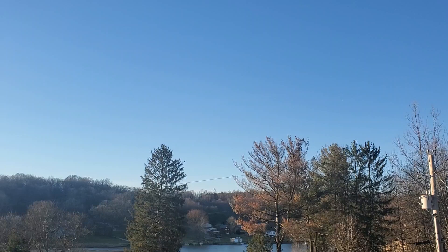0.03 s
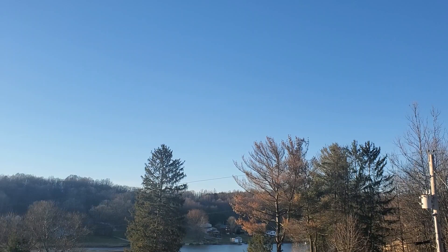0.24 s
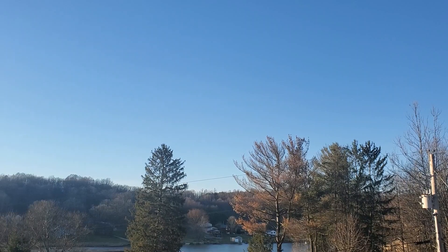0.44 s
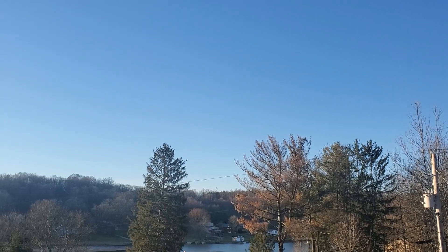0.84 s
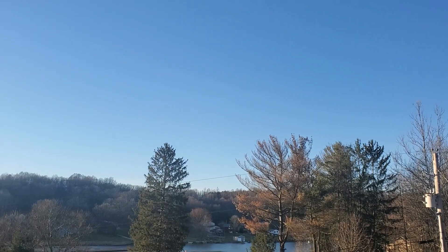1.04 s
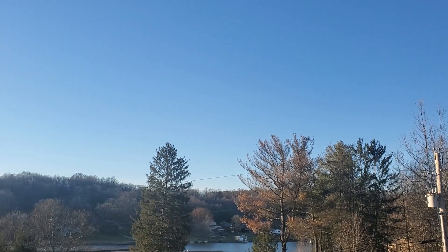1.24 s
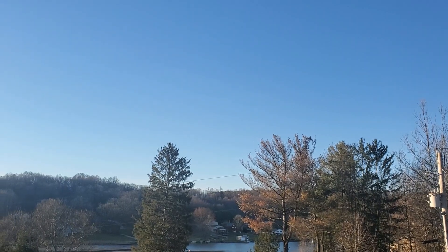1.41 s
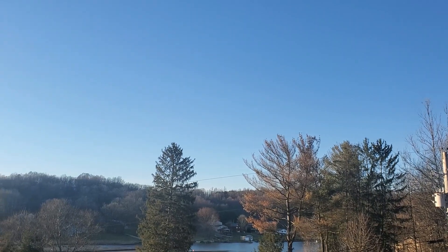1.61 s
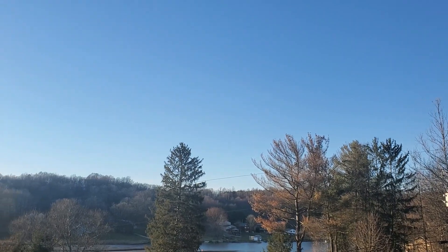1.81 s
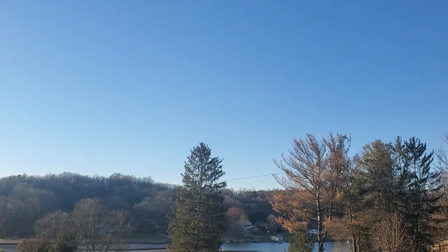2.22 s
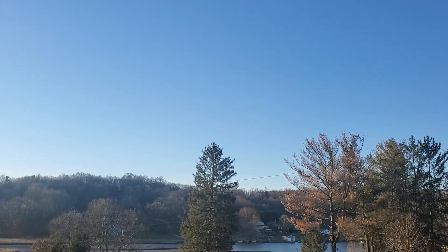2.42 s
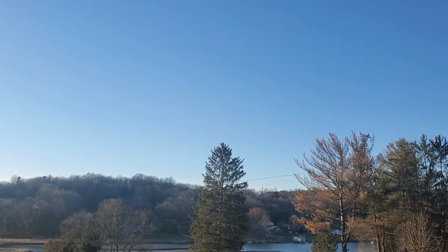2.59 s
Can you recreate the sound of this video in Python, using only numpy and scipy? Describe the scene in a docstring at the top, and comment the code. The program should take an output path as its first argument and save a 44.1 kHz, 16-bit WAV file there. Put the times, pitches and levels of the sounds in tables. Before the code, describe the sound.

A dense chorus of small frogs peeps over low wind rumble and faint distant birds.

```python
"""A chorus of small frogs peeps around a lake, each call a short, near-pure whistle sliding upward.
Near frogs stand out of a far crowd whose calls overlap. Distant birds whistle and chip, and the
wooded shore reflects birds and frogs as a diffuse echo. Under them lie a valley hum and a wash
of far callers, while a light, turbulent wind buffets two microphones, mostly the right one."""
import sys
import numpy as np
from scipy import signal
from scipy.fft import rfft, irfft
from scipy.io import wavfile

SR = 44100
rng = np.random.default_rng(int(sys.argv[2]) if len(sys.argv) > 2 else 0)


def log_audio(samples):
    """Write samples as a 16-bit WAV file to the path given in sys.argv[1]."""
    # one column per channel
    frames = np.atleast_2d(samples).T
    # limit to full scale, then quantise
    limited = np.clip(frames, -1, 1)
    pcm = np.round(limited * 32767).astype(np.int16)
    wavfile.write(sys.argv[1], SR, pcm)


N = 121275

# valley hum and microphone hiss: frequency_hz, relative_density_db
AIR_SPECTRUM = [(60, 6), (170, 0), (225, 4.5), (310, -7), (490, -11.5), (600, -17.5), (1100, -26),
                (5200, -23), (6500, -31), (8400, -39), (9700, -35), (10800, -29.5), (16000, -29.5)]
# wash of far birds and frogs: frequency_hz, relative_density_db
WASH_SPECTRUM = [(1200, -6), (1600, 1.5), (2100, -1), (2700, 7.5), (3300, 2.5), (4000, -0.5), (4700, -2.5),
                 (5200, -1.5), (5700, -22), (7200, -26.5), (8000, -36)]
# loudness of the wash: time_s, level_db
WASH_LEVELS = [(.1, -61), (.5, -70), (.75, -66.5), (.92, -72.5), (1.12, -66), (1.3, -69.5), (1.5, -67.5),
               (1.75, -70), (2.0, -69.5), (2.5, -69), (2.75, -71)]
# wind rumble: frequency_hz, relative_density_db
WIND_SPECTRUM = [(15, -22.5), (30, -8.5), (48, 2.5), (80, -0.5), (105, -8.5), (135, -17.5), (200, -28.5),
                 (320, -38.5), (700, -72.5)]
# gusts and lulls: time_s, relative_level_db
GUST_LEVELS = [(0.12, -44), (0.16, -37.5), (0.2, -46.5), (0.32, -40.5), (0.35, -59.5), (0.4, -40),
               (0.65, -48), (0.72, -37), (0.77, -57), (0.8, -37.5), (0.91, -60), (1.05, -51.5),
               (1.56, -53.5), (1.65, -43.5), (1.68, -52), (1.87, -50), (1.91, -37), (1.95, -53.5),
               (2.16, -45.5), (2.24, -58), (2.31, -47), (2.42, -77.5), (2.47, -56), (2.74, -62)]
# balance of the wind: time_s, left_minus_right_db
WIND_BALANCE = [(.55, -2.5), (.85, -12.5), (1.2, -6.5), (1.55, -19), (1.9, -20.5), (2.25, -12.5),
                (2.6, -6.5)]
# far, rough calls: start_s, length_s, centre_hz, half_width_hz, level_db
ROUGH_CALLS = [(.40, .14, 6200, 600, -77), (.2, .55, 5130, 130, -74), (1.05, .17, 4100, 280, -72),
               (.78, .12, 7450, 220, -82), (1.66, .13, 7700, 120, -82), (1.38, .17, 4500, 900, -74),
               (.2, .42, 490, 45, -73.5), (.95, .35, 1900, 250, -71), (.2, .52, 3400, 350, -71),
               (.11, .27, 2080, 170, -68), (2.55, .25, 3950, 70, -75)]
# bird notes: start_s, length_s, start_pitch_hz, middle_pitch_hz, end_pitch_hz, relative_level_db
BIRD_NOTES = [(.11, .11, 4370, 4410, 4440, -65.5), (.22, .08, 4440, 4480, 4510, -69),
              (.112, .028, 3480, 3520, 3500, -63), (.11, .07, 2040, 2020, 1980, -69),
              (.245, .075, 2160, 2135, 2080, -63), (.51, .16, 4000, 3980, 3970, -71),
              (.558, .03, 1550, 1535, 1510, -67), (.545, .04, 2500, 2400, 2330, -63),
              (.605, .028, 1800, 2030, 2120, -63), (.628, .042, 2110, 1980, 1760, -61),
              (.62, .035, 4200, 4000, 3800, -69), (.759, .024, 6400, 7150, 7450, -66),
              (.775, .03, 7250, 7650, 7550, -68), (.878, .042, 2200, 2220, 1950, -61),
              (.92, .03, 2030, 1970, 1900, -67), (.975, .045, 1800, 2000, 1920, -62),
              (.995, .055, 1960, 1800, 1520, -67), (1.095, .025, 1850, 1760, 1680, -65),
              (1.103, .022, 4250, 4130, 3950, -65), (1.262, .036, 2220, 2080, 1820, -62),
              (1.285, .035, 1940, 1900, 1830, -66), (1.35, .05, 1680, 1700, 1560, -68),
              (1.445, .02, 4000, 4700, 5200, -67), (1.465, .045, 4600, 4150, 3850, -69),
              (1.57, .17, 4130, 4290, 4350, -77), (1.705, .038, 2280, 1990, 1780, -64),
              (1.805, .04, 1620, 1660, 1610, -70), (1.85, .05, 4950, 4680, 4450, -72),
              (1.80, .11, 4620, 4200, 3850, -73.5), (2.125, .045, 2200, 2000, 1720, -69.5),
              (2.15, .04, 4650, 4400, 3750, -71), (2.2, .025, 6600, 6900, 7000, -79),
              (2.22, .06, 1640, 1655, 1630, -70), (2.205, .1, 3950, 3935, 3930, -69),
              (2.46, .085, 3900, 3930, 3910, -71), (2.37, .05, 10000, 10350, 9300, -82),
              (2.383, .035, 5230, 5150, 5030, -70), (2.468, .025, 2000, 2060, 2020, -69),
              (2.555, .06, 2230, 1900, 1790, -68)]
# loudness of the far frogs: time_s, level_db
CROWD_LEVELS = [(.1, -58.5), (.45, -58.5), (.7, -59), (.95, -61), (1.15, -57), (1.4, -61), (1.8, -63.5),
                (2.05, -63), (2.3, -59), (2.75, -63)]
# near frogs: start_s, length_s, start_pitch_hz, end_pitch_hz, level_db, left_minus_right_db
NEAR_PEEPS = [(0.252, 0.095, 2600, 2728, -60.5, 5), (.39, 0.088, 2712, 2812, -59, 0),
              (0.608, 0.13, 2490, 2830, -60.5, -1), (0.783, 0.057, 2630, 2764, -55, -3),
              (0.791, 0.053, 2820, 2960, -54, -1), (1.048, 0.15, 2350, 2510, -65.5, 8),
              (1.088, 0.12, 2690, 2980, -54.5, -1.5), (1.255, 0.042, 2400, 2426, -60, 0),
              (1.314, 0.17, 2460, 2720, -58, -2.5), (1.646, .058, 2650, 2687, -61.5, -4.5),
              (1.883, 0.12, 2634, 2740, -62, 1.5), (1.888, 0.13, 2840, 3080, -63, -8.5),
              (1.913, .11, 2370, 2537, -63, 4.5), (2.016, 0.12, 2530, 2767, -63, 7),
              (2.059, 0.086, 2770, 2847, -58.5, -4), (2.15, 0.045, 2890, 2967, -50, 4),
              (2.126, 0.12, 2590, 2857, -61, 7), (2.2, 0.14, 2485, 2820, -52.5, 2),
              (2.208, .1, 2900, 3190, -55.5, -7), (2.278, 0.046, 2910, 3070, -54, -0.5),
              (2.365, .1, 2613, 2790, -55, 3), (2.368, 0.078, 2770, 2987, -55, 3),
              (2.491, 0.12, 2780, 3100, -60.5, -5.5)]
# one long frog call: start_s, length_s, start_pitch_hz, end_pitch_hz, left_minus_right_db
LONG_CALL = (2.285, .5, 2240, 2930, 5.1)
# swell of the long call: time_s, level_db
LONG_CALL_LEVELS = [(2.29, -76), (2.38, -79.5), (2.42, -65), (2.48, -62), (2.54, -64), (2.62, -61),
                    (2.75, -62.5)]
# nearest frog: start_s, length_s, start_pitch_hz, end_pitch_hz, level_db, left_minus_right_db
NEAREST_PEEPS = [(.988, 0.085, 2900, 3120, -47, -6.5), (2.09, 0.106, 2897, 3166, -45, -4.5)]
# overtones of the nearest frog: pitch_ratio, relative_level_db
NEAREST_OVERTONES = [(1.5, -46), (2, -35), (2.5, -34)]

FROG_LAG_S = 0.0004692  # the peeps reach the left microphone first


def amp(db):
    """Amplitude grows tenfold for every 20 dB."""
    return 10 ** (np.asarray(db) / 20)


def unit(x):
    """Normalisation brings a signal to an rms of 1."""
    return x / np.sqrt(np.mean(x ** 2) + 1e-20)


def envelope(points):
    """Gain moves linearly in decibels between (time_s, level_db) points."""
    return amp(np.interp(np.arange(N) / SR, *np.transpose(points)))


def stereo_gain(pan_db, db=0):
    """A level difference, left minus right, gives a source its direction."""
    return amp([[db + pan_db / 2], [db - pan_db / 2]])


def add(mix, start_s, sound):
    """Superposition: a stereo sound adds to the mix from start_s on."""
    at = max(round(start_s * SR), 0)
    part = mix[:, at:at + sound.shape[1]]
    part += sound[:, :part.shape[1]]


def drift(size, rate_hz):
    """Low-passed noise gives a smooth random fluctuation of about unit size."""
    hz = np.fft.rfftfreq(16384, 1 / SR)
    white = rfft(rng.standard_normal(16384))
    return np.resize(unit(irfft(white * np.exp(-(hz / rate_hz) ** 2))), size)


def noise(spectrum):
    """Spectral shaping colours two uncorrelated channels of white noise."""
    hz, db = np.transpose(spectrum)
    shape = amp(np.interp(np.log(np.fft.rfftfreq(N, 1 / SR) + 1), np.log(hz), db))
    return unit(irfft(rfft(rng.standard_normal((2, N))) * shape, N))


def whistle(hz, lag_s, attack_s=0.017, release_s=0.019, wobble=0.0036, overtones=()):
    """Phase is the integral of a wavering pitch; the right microphone's phase trails by lag_s."""
    t = np.arange(len(hz)) / SR
    hz = hz * (1 + wobble * drift(len(t), rate_hz=216))
    cycles = np.cumsum(hz) / SR + rng.random() - np.outer([0, lag_s], hz)
    phase = 2 * np.pi * cycles
    tone = np.sin(phase) + sum(amp(db) * np.sin(ratio * phase) for ratio, db in overtones)
    attack = np.sin(np.pi / 2 * np.clip(t / attack_s, 0, 1))
    release = np.sin(np.pi / 2 * np.clip(t[::-1] / release_s, 0, 1))
    flutter = amp(drift(len(t), rate_hz=51))  # about 1 dB
    return np.sqrt(2) * tone * attack * release * flutter


def shore_echo(direct, echo_db, t60_s, correlation):
    """Diffuse reflection from trees and banks adds a decaying tail, correlated between microphones."""
    t = np.arange(SR) / SR
    reflections = rng.standard_normal((3, SR)) * (rng.random((3, SR)) < 2000 / SR)  # 2000 a second
    tails = reflections * 1000 ** (-t / t60_s) * (1 - np.exp(-t / .008))
    tails /= np.linalg.norm(tails, axis=1, keepdims=True)
    response = np.sqrt(correlation) * tails[2] + np.sqrt(1 - correlation) * tails[:2]
    return direct + amp(echo_db) * signal.fftconvolve(direct, response, axes=1)[:, :N]


def background():
    """Valley hum leans right under microphone hiss; countless far callers sum incoherently to a wash."""
    air = noise(AIR_SPECTRUM)
    hum = signal.sosfiltfilt(signal.butter(2, 600, fs=SR, output="sos"), air)
    hiss = air - hum
    leaning_hum = np.array([0.33 * hum[0] + 0.42 * hum[1], 1.09 * hum[1]])
    wash = noise(WASH_SPECTRUM) * envelope(WASH_LEVELS)
    return amp(-63) * (hiss + leaning_hum) + wash


def wind():
    """Turbulence rumbles separately at each microphone; the left one's shelter varies as the wind turns."""
    sides = np.array([envelope(WIND_BALANCE), np.ones(N)])
    sides /= np.linalg.norm(sides, axis=0)
    return amp(6.5) * noise(WIND_SPECTRUM) * envelope(GUST_LEVELS) * sides


def rough_calls():
    """Far, rough calls smear into narrow-band noise that swells and fades."""
    out, hz = np.zeros((2, N)), np.fft.rfftfreq(N, 1 / SR)
    for start_s, length_s, centre_hz, half_width_hz, db in ROUGH_CALLS:
        shape = np.exp(-((hz - centre_hz) / half_width_hz) ** 2 / 2)
        band = unit(irfft(rfft(rng.standard_normal((2, N))) * shape, N))
        swell = np.sin(np.linspace(0, np.pi, int(length_s * SR)))
        add(out, start_s, amp(db) * swell * band[:, :len(swell)])
    return out


def birds():
    """Frequency modulation bends each distant note through three pitches; reverberation blurs it."""
    out = np.zeros((2, N))
    for start_s, length_s, *pitches_hz, db in BIRD_NOTES:
        parabola = np.polyfit([0, .5, 1], pitches_hz, 2)
        hz = np.polyval(parabola, np.linspace(0, 1, int(length_s * SR)))
        wobble = .003 + .03 * np.ptp(np.log2(hz))  # wide slurs are hoarser than held notes
        lag_s = .00008 * rng.standard_normal()
        add(out, start_s, amp(db) * whistle(hz, lag_s, attack_s=.0043, release_s=.0043, wobble=wobble))
    return amp(-3.7) * shore_echo(out, echo_db=0, t60_s=.42, correlation=.11)


def far_frogs(calls_per_s=110, centre_hz=2791, spread_hz=190, rise_hz=220.6):
    """Peeps from across the water, each with its own pitch and bearing, superpose into a chorus."""
    out, count = np.zeros((2, N)), int(calls_per_s * N / SR)
    for k, (jitter, pitch, size, loudness, bearing) in enumerate(rng.uniform(-1, 1, (count, 5))):
        length_s = .11 * (1 + .314 * size)
        glide_hz = rise_hz * np.linspace(-.5, .5, int(length_s * SR))
        hz = centre_hz + spread_hz * np.arctanh(np.tanh(1.6) * pitch) + glide_hz
        peep = whistle(hz, FROG_LAG_S + .00012 * bearing, wobble=.007)
        gain = amp(6.5 * loudness + 3.5 * pitch ** 2)  # the rarer high and low voices are louder
        add(out, (k + jitter) / calls_per_s, peep * gain)
    chorus = unit(shore_echo(out, echo_db=2, t60_s=.98, correlation=1))
    return chorus * envelope(CROWD_LEVELS) * stereo_gain(pan_db=-2.4)


def near_frogs():
    """Each peep is a linear upward sweep that leads at the left microphone by about half a millisecond."""
    out = np.zeros((2, N))
    for start_s, length_s, low_hz, high_hz, db, pan_db in NEAR_PEEPS:
        hz = np.linspace(low_hz, high_hz, int(length_s * SR))
        peep = whistle(hz, FROG_LAG_S + .00002 * rng.standard_normal())
        add(out, start_s, peep * stereo_gain(pan_db, db))
    return out


def long_call():
    """One frog swells through an accelerating upward sweep."""
    out = np.zeros((2, N))
    start_s, length_s, low_hz, high_hz, pan_db = LONG_CALL
    progress = np.linspace(0, 1, int(length_s * SR))
    call = whistle(low_hz + (high_hz - low_hz) * progress ** 1.7, FROG_LAG_S)
    swell = amp(np.interp(start_s + length_s * progress, *np.transpose(LONG_CALL_LEVELS)))
    add(out, start_s, call * swell * stereo_gain(pan_db))
    return out


def nearest_frog(fade_db=-19.5):
    """A sweep with faint overtones starts strongly, then decays as its pitch levels off."""
    out = np.zeros((2, N))
    for start_s, length_s, low_hz, high_hz, db, pan_db in NEAREST_PEEPS:
        progress = np.linspace(0, 1, int(length_s * SR))
        hz = high_hz - (high_hz - low_hz) * (1 - progress) ** 2.29
        peep = whistle(hz, FROG_LAG_S, overtones=NEAREST_OVERTONES)
        add(out, start_s, peep * amp(fade_db * progress ** 2) * stereo_gain(pan_db, db))
    return out


def scene():
    """All sources add linearly; the nearby frogs share one short echo."""
    nearby = near_frogs() + nearest_frog() + long_call()
    nearby = shore_echo(nearby, echo_db=-7, t60_s=.4, correlation=.92)
    return nearby + far_frogs() + birds() + rough_calls() + background() + wind()


def record(dry, silence_s=.104, cutoff_hz=15800):
    """A gate opens after a moment of silence, and a low-pass filter limits the band."""
    gate = np.clip((np.arange(N) / SR - silence_s) / .002, 0, 1)
    lowpass = signal.firwin(511, cutoff_hz, window=("kaiser", 9), fs=SR)
    return signal.oaconvolve(dry * gate, lowpass[None], "same")


dry = scene()
out = record(dry)
log_audio(out)
```